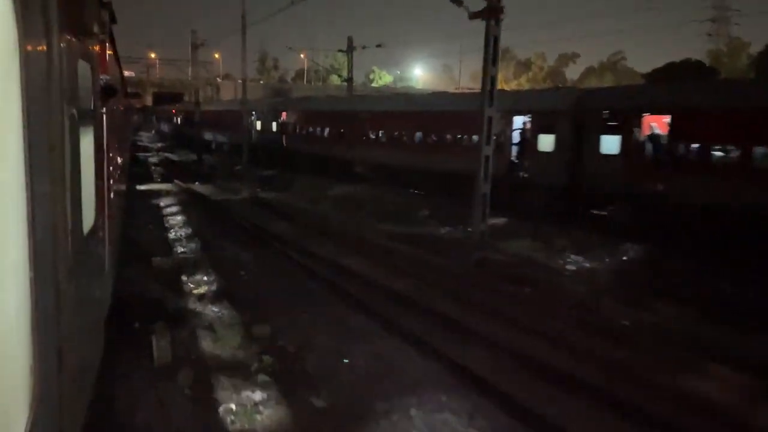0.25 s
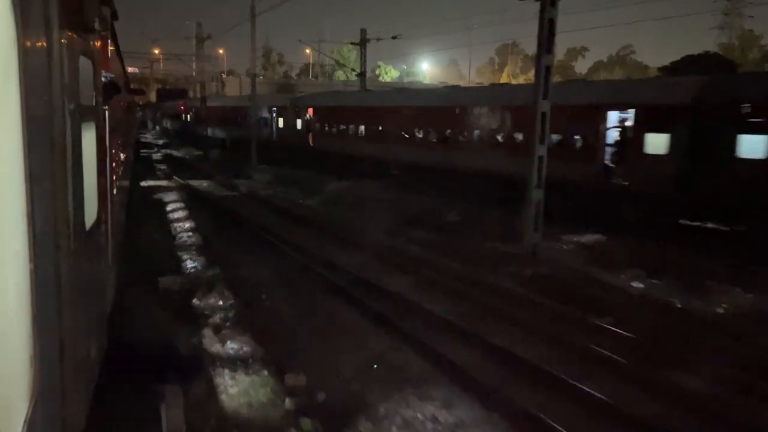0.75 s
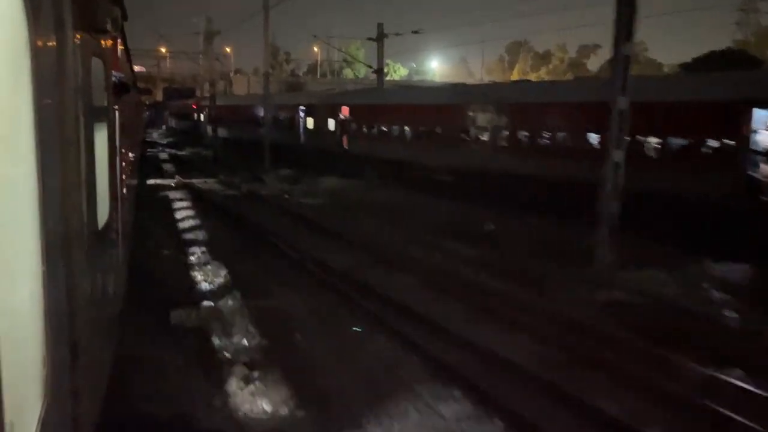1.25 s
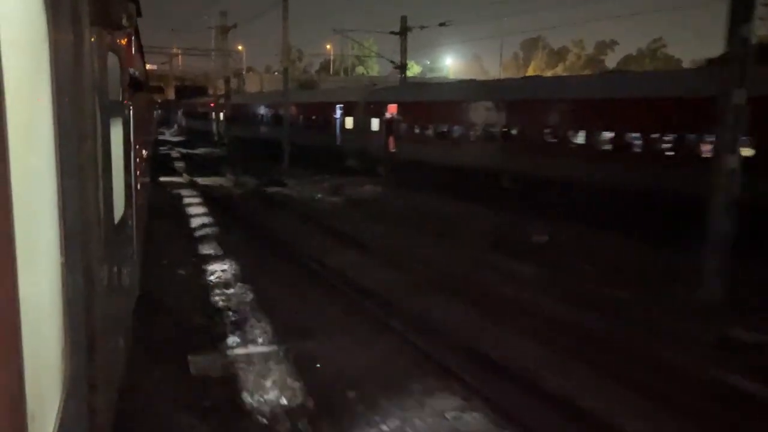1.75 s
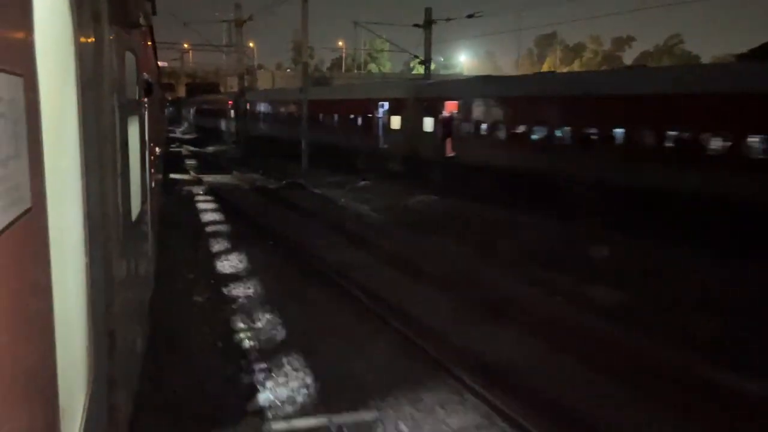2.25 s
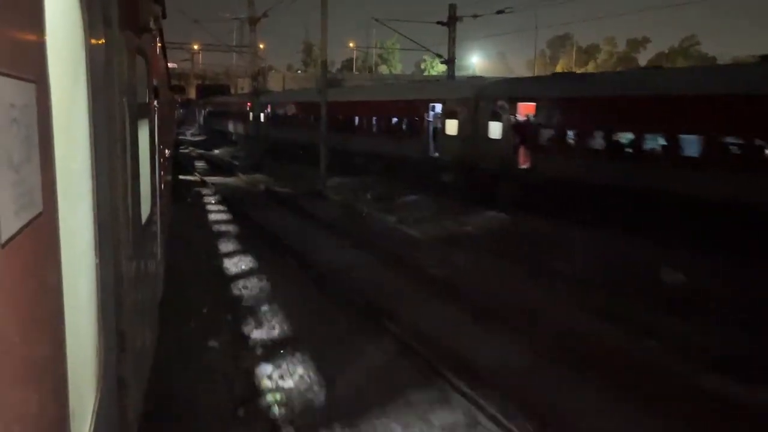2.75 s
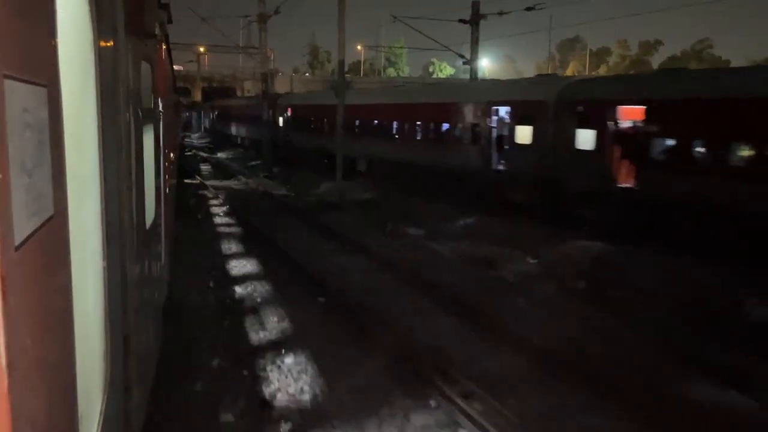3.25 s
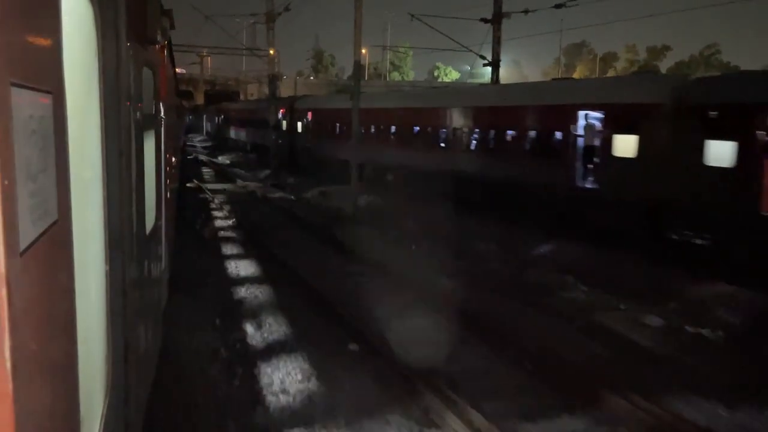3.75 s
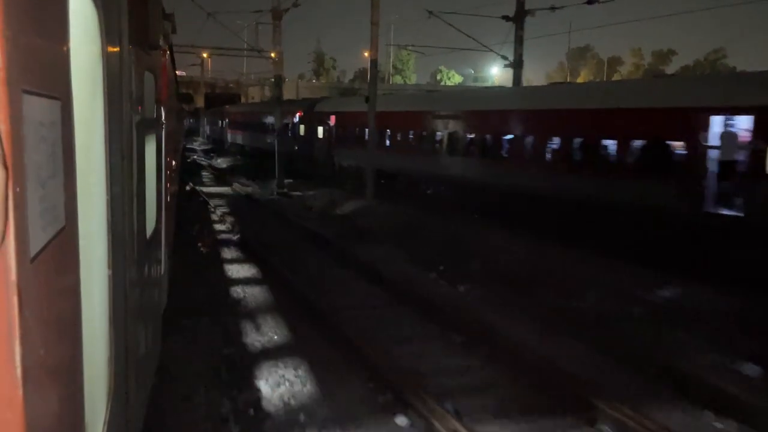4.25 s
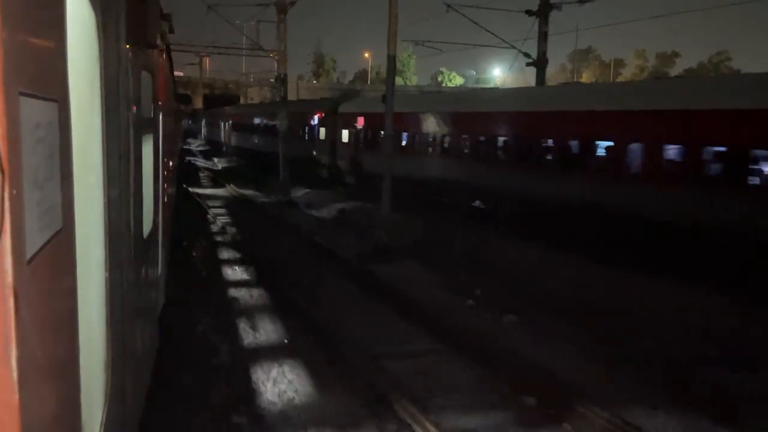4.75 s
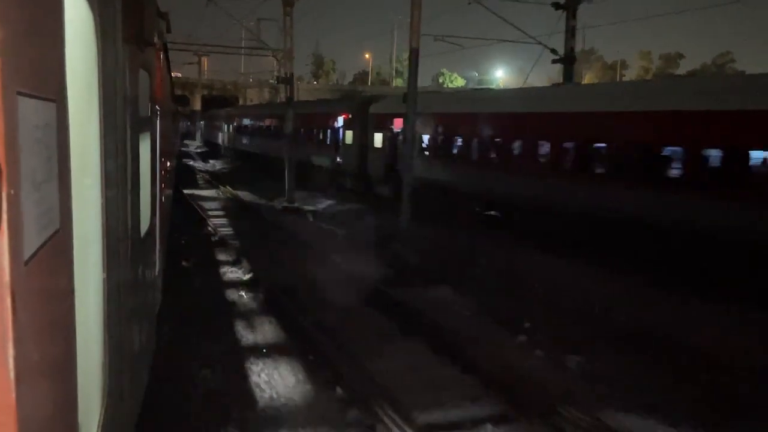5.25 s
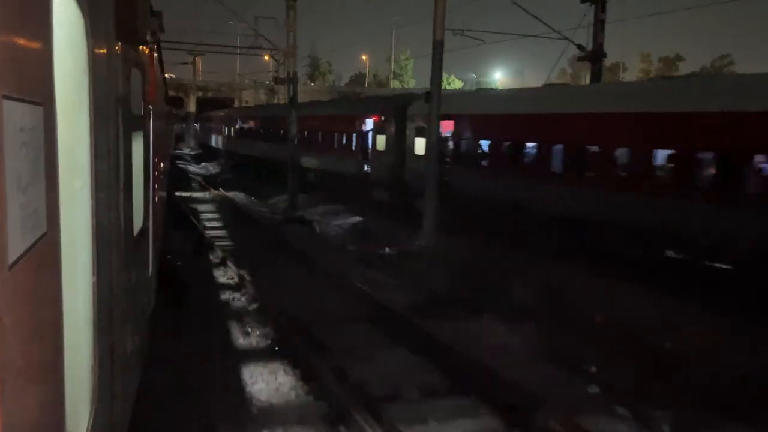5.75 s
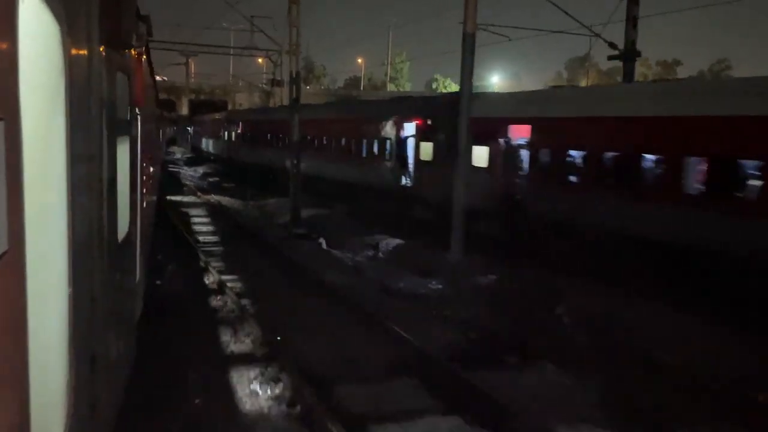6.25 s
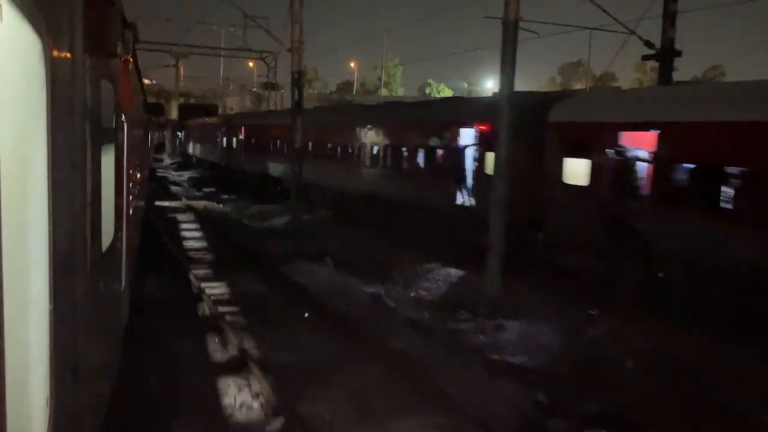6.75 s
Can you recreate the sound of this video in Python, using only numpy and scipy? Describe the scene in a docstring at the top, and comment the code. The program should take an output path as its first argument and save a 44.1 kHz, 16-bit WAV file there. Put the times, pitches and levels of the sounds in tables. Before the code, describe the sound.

Heard from an open coach door, slow train wheels shriek, scrape and thud over rail joints, with a short quiet gap before squealing again.

```python
"""Train wheels squeal and grind as a passenger train rolls slowly through a station yard,
heard from an open coach door. Wheel tones sing together with pitch-shifted reflections from the
moving coaches, and flanges pressed on the rail make noise that rings the wheels. Steel clangs,
wheels knock over joints and points as bursts in the coach body and bogie, and the rolling coach
rumbles and rattles as coloured noise."""
import sys
import numpy as np
from scipy import signal
from scipy.fft import rfft, irfft
from scipy.io import wavfile

SR = 44100
rng = np.random.default_rng(int(sys.argv[2]) if len(sys.argv) > 2 else 0)


def pcm_store(signal):
    """Save signal as 16-bit PCM."""
    levels = np.round(np.clip(np.atleast_2d(signal), -1, 1) * 32767)
    wavfile.write(sys.argv[1], SR, levels.astype(np.int16).T)


N = 308700  # 7 seconds
T = np.arange(N) / SR
FREQS = np.fft.rfftfreq(N, 1 / SR) + 1e-3
HIGH_HZ, LOW_HZ = 4490, 2297  # pitches of the two long squeals
GEAR_PAN_DB = 2  # the running gear lies to the left: left minus right


def undb(db):
    """Decibels to gain."""
    return 10 ** (np.asarray(db) / 20)


def unit(x):
    """Scale to rms 1."""
    return x / np.sqrt(np.mean(x ** 2) + 1e-18)


def pan(db):
    """Gains that make the left louder than the right by db."""
    return undb([[db / 2], [-db / 2]])


def curves(table):
    """Each column of a timed table, joined by straight lines, sample by sample."""
    seconds, *columns = np.transpose(table)
    return [np.interp(T, seconds, column) for column in columns]


def colour(points):
    """Gain at each frequency from rows of Hz and dB."""
    hz, db = np.transpose(points)
    return undb(np.interp(np.log(FREQS), np.log(hz), db))


def resonances(modes, freqs):
    """Response of a set of damped modes, each peaking at its own pitch."""
    return sum(undb(db) / (1 + 1j * (freqs / hz - hz / freqs) * hz / width) for hz, width, db in modes)


def walk(rate, size=N):
    """Random drift with spread near 1: a new target rate times a second, joined by straight lines."""
    place = np.arange(size) * rate / SR
    knots, k = rng.standard_normal(4096), place.astype(int)
    blend = place - k
    return knots[k] + (knots[k + 1] - knots[k]) * blend


def ears(mid, side, spread):
    """Left and right from a shared part and a diffuse part."""
    return np.array([mid + spread * side, mid - spread * side]) / np.sqrt(1 + spread ** 2)


def diffuseness(freqs):
    """Long waves reach both ports alike, short ones less so; the difference eases again at the top."""
    return .16 + .68 * freqs / (freqs + 330) * freqs / (freqs + 165) / (1 + (freqs / 5500) ** 2)


def noise(gain, grain_db=0):
    """Spectrum of stereo noise with the given colour; grain_db makes its level uneven in tiny bursts."""
    mid, side = rfft(rng.standard_normal((2, N)) * undb(grain_db * walk(400)))
    return ears(mid, side, diffuseness(FREQS)) * gain


def band_rms(spectrum, lo_hz, hi_hz):
    """Strength of a stereo spectrum between two frequencies, used to set levels."""
    return np.sqrt(np.sum(abs(spectrum[:, (FREQS > lo_hz) & (FREQS < hi_hz)]) ** 2)) / N


def add(out, start, sound):
    """Mix a sound in at its time."""
    i = int(np.clip(start * SR, 0, N - 1))
    out[:, i:i + sound.shape[1]] += sound[:, :N - i]


WAVER_SHARE, WAVER_PER_S = 0.09, 14  # pitch waver as a share of the spread, and its rate
SQUEAL_ROUGH_DB = 1.5  # flutter of a squeal's level as the contact chatters


def squeal(hz, spread_hz, reflected, size, second_db=-24, third_db=-32, lead=0, width=0.54, count=11):
    """One self-excited wheel mode; reflections come with their own Doppler shifts and beat against it."""
    step = 32  # the slow changes are worked out once every 32 samples
    slow = size // step + 2
    t = np.arange(size) / SR

    def drift(rate):
        return walk(rate * step, slow)

    def turn(shift_hz):
        cycles = np.cumsum(shift_hz) * step / SR
        return np.exp(2j * np.pi * (cycles + rng.random()))

    # the further a reflection is shifted, the weaker it is
    offsets = np.linspace(-2.8, 2.8, count)
    weights = unit(np.exp(-(offsets / 2) ** 2))
    paths = [weight * turn(spread_hz * (offset + .45 * drift(15.625)))
             for offset, weight in zip(offsets, weights)]
    # each reflection arrives from its own direction, so the ports hear it out of step
    angles = width * rng.permutation(np.linspace(-1.5, 1.5, count))
    echoes = np.exp(1j * np.array([angles, -angles])) @ paths / np.sqrt(count)
    share = np.clip(reflected, 0, 1)
    # the pitch wavers with the load on the wheel, and the contact chatters
    waver = turn(WAVER_SHARE * spread_hz * drift(WAVER_PER_S))
    waver = waver * undb(SQUEAL_ROUGH_DB * drift(15.625))
    # lead: how far the left port's direct sound is ahead of the right's, in radians
    direct = np.exp(.5j * np.array([[lead], [-lead]]))
    swing = (np.sqrt(1 - share) * direct + np.sqrt(share) * echoes) * waver
    slow_t = np.arange(slow) * step / SR
    tone = np.array([np.interp(t, slow_t, s) for s in swing]) * np.exp(2j * np.pi * hz * t)
    # stick and slip add overtones
    overtones = sum(undb(db) * tone ** k / (abs(tone) + 1e-9) ** (k - 1)
                    for k, db in enumerate([second_db, third_db], 2) if k * hz < SR / 2)
    return unit((tone + overtones).real)


def long_squeal(table, hz, gain_db, spread_hz, reflected, second_db, third_db, lead=0):
    """A wheel that keeps singing, its level swelling, dipping and fluttering."""
    level_db, = curves(table)
    edge_s = 0.013  # fade at each end
    held = np.clip(np.minimum(T - table[0][0], table[-1][0] - T) / edge_s, 0, 1)
    tone = squeal(hz, spread_hz, reflected, N, second_db, third_db, lead)
    return tone * undb(level_db + gain_db) * held


# How loud the high long squeal is over time.
# Each row: time in seconds, level in dB before the gain below.
HIGH_SQUEAL_LEVELS = [(0.372, -36), (0.386, -23), (.445, -18.5), (.475, -26), (.505, -16), (.575, -26),
                      (.605, -18), (.645, -22), (.68, -16), (.715, -20.5), (0.788, -14), (0.83, -20.5),
                      (0.904, -27.5), (0.948, -13.5), (.967, -27), (.987, -17), (1.085, -24), (1.13, -19),
                      (1.16, -22.5), (1.284, -25.5), (1.45, -31.5), (1.53, -35.5), (1.8, -47)]


def high_squeal():
    """A high wheel mode sings, mostly heard through its reflections."""
    return long_squeal(HIGH_SQUEAL_LEVELS, HIGH_HZ, gain_db=1.2, spread_hz=39, reflected=.72,
                       second_db=-20, third_db=-21.5)


# How loud the low long squeal is over time.
# Each row: time in seconds, level in dB before the gain and pan below.
LOW_SQUEAL_LEVELS = [(1.2, -41), (1.45, -44), (1.8, -35.5), (2.14, -27.5), (2.25, -31), (2.38, -24.5),
                     (2.52, -29), (2.66, -37), (2.93, -32.5), (3.2, -23.5), (3.58, -26.5), (3.66, -28),
                     (3.79, -25), (3.95, -26), (4.12, -17), (4.26, -20.5), (4.5, -21.5), (4.63, -32.5),
                     (4.82, -51)]


def low_squeal():
    """A lower wheel mode sings, mostly heard directly and louder on the left."""
    tone = long_squeal(LOW_SQUEAL_LEVELS, LOW_HZ, gain_db=1.5, spread_hz=30, reflected=.36,
                       second_db=-34, third_db=-44, lead=-1.15)
    return tone * pan(4.4)


# Short squeals and groans of the wheels, and the brief tones that ring after the steel strike at 0.385 s (the
# rows from 0.385 to 0.41 s at 1960, 2668 and 5507 Hz). Each row: start in seconds, end in seconds (when it
# begins to ring out), pitch in Hz, level in dB, reflected share from 0 to 1, pitch spread of the reflections in
# Hz.
SHORT_SQUEALS = [ (.225, .33, 2660, -34, .7, 35), (.19, .33, 2170, -38, .5, 20),
                 (.47, .62, 3215, -35, .9, 35), (.78, .96, 2115, -38, .6, 20), (.6, 1.0, 7500, -36, .6, 35),
                 (.235, .32, 3570, -37.5, .8, 30), (.394, .412, 2668, -15, .6, 60),
                 (.385, .412, 1960, -19, 1, 100), (.396, .41, 5507, -20, .8, 80),
                 (.385, .44, 3784, -29, .9, 70), (.42, .5, 2668, -31, .9, 50),
                 (.385, .53, 4722, -29, .7, 35), (.4, .58, 9445, -33, .5, 45),
                 (.45, .8, 5255, -36.5, 1, 55), (.6, .76, 2145, -35, .6, 18), (.88, .98, 3446, -38, .7, 25),
                 (1.5, 1.94, 2390, -39, .25, 14), (2.32, 2.41, 2385, -30, .6, 16),
                 (2.41, 2.47, 2660, -27, .7, 45), (2.6, 3.22, 2390, -33, .5, 16),
                 (3.55, 3.8, 2385, -33, .5, 16), (3.55, 3.78, 2660, -33, .8, 35),
                 (4.2, 4.52, 3190, -35, .7, 25), (4.45, 4.52, 1005, -35, .6, 18),
                 (1.8, 2.36, 4810, -44.5, .9, 30), (1.853, 2.4, 4040, -43, .9, 30),
                 (2.45, 2.9, 7830, -34, .4, 40), (2.44, 2.606, HIGH_HZ, -22, 1, 28),
                 (2.45, 2.95, 2090, -35, 1, 70), (2.5, 2.7, 3446, -29, .3, 22),
                 (2.71, 3.08, 1748, -28.5, .65, 16), (2.6, 3.2, 4052, -29.5, .6, 28),
                 (2.6, 3.16, HIGH_HZ, -28, .6, 35), (2.8, 2.85, HIGH_HZ, -25, .6, 28),
                 (3.007, 3.09, HIGH_HZ, -22.5, .94, 28), (3.18, 3.335, 734, -24.5, .1, 9),
                 (3.39, 3.51, 732, -25, .2, 10), (3.18, 3.44, 1470, -38, .2, 12),
                 (3.323, 3.434, 6280, -30, .7, 50), (3.375, 3.5, HIGH_HZ, -21, .6, 30),
                 (3.36, 4.0, 1750, -35, 1, 22), (3.62, 3.72, 1760, -29, .6, 18),
                 (3.715, 3.92, 1771, -23.2, .1, 12), (3.6, 4.0, 3560, -36, 1, 65),
                 (3.398, 4.45, 4070, -38, .9, 50), (4.06, 4.5, 855, -34, .4, 9),
                 (3.55, 3.6, 1115, -32, .7, 25), (3.88, 4.08, 1060, -33.5, 1, 60),
                 (3.997, 4.3, 10900, -38, .5, 50), (4.303, 4.55, 2385, -30, .95, 20),
                 (4.5, 4.74, 4810, -45, 1, 40), (5.03, 5.324, 3540, -47.5, 0, 20),
                 (5.795, 5.96, 3272, -22.5, .15, 20), (5.98, 6.3, 3270, -31, .9, 35),
                 (5.785, 5.86, 1000, -29, .7, 25), (5.86, 6.38, 970, -31, 1, 50),
                 (5.85, 6.35, 2295, -25, .6, 20), (5.85, 6.28, 2360, -25, .7, 22),
                 (5.77, 6.32, 4984, -30.5, .9, 35), (5.95, 6.38, 4780, -29.5, .8, 35),
                 (5.88, 6.4, 5857, -31, .9, 35), (5.9, 6.28, 856, -24.5, .4, 12),
                 (5.95, 6.16, 4065, -25.5, .85, 45), (6.23, 6.42, 4040, -29, .8, 30),
                 (5.85, 6.39, 1745, -32, 1, 22), (6.297, 7.0, 248.6, -31, .57, 9),
                 (6.4, 7.0, 4460, -39.5, 1, 40), (6.58, 6.93, 6190, -37, .9, 40),
                 (6.6, 6.95, 6450, -42, 1, 100), (6.51, 6.65, 2659, -34, .6, 22),
                 (6.66, 6.89, 2015, -34.5, 1, 36)]
SQUEAL_RISE_SHARE = 0.16  # part of its length that a squeal takes to build up
# longest time to fade 20 dB; squeals shorter than the second value fade clearly sooner
SQUEAL_FALL_S, SQUEAL_FALL_LENGTH_S = 0.43, 0.29
GROAN_BELOW_HZ, GROAN_PAN_DB = 900, 5.5  # the low groans lie to the left: left minus right


def short_squeals():
    """Modes that build up, hold briefly and ring out when the wheel lets go; a few brief ones ring after the
    steel strike at 0.385 s."""
    out = np.zeros((2, N))
    for start, end, hz, db, reflected, spread_hz in SHORT_SQUEALS:
        length = max(end - start, .01)
        rise = SQUEAL_RISE_SHARE * length
        fall = SQUEAL_FALL_S * np.tanh(length / SQUEAL_FALL_LENGTH_S)
        t = T[:int((length + 2 * fall) * SR)]
        build_up = np.sin(np.pi / 2 * np.minimum(t / rise, 1)) ** 2
        ring_out = 10 ** -(np.maximum(t - length, 0) / fall)
        tone = squeal(hz, spread_hz, reflected, len(t)) * build_up * ring_out
        add(out, start, tone * undb(db) * pan(GROAN_PAN_DB * (hz < GROAN_BELOW_HZ)))
    return out


# A flange presses on the rail, grows or weakens, then lets go.
# Each row: start in seconds, end in seconds, bite time in seconds, first level in dB, last level in dB,
# then fine hiss, growl and wheel ring, each in dB relative to the grinding (all before later trims).
FLANGE_SCRAPES = [(0.184, .38, 0.13, -30, -39, -9, 15.5, -1), (0.372, 0.4, 0.028, -24, -21.5, -19, -0.5, 3),
                  (0.41, 0.94, 0.049, -28.5, -34.5, 0, 0.5, 2.5),
                  (1.055, 1.432, 0.095, -31, -40.5, -1.5, 0.5, 0),
                  (1.473, 2.4, .11, -44, -36, -11.5, 7.5, -1.5),
                  (2.398, 3.127, 0.053, -24, -29, -6, -2.5, -2),
                  (3.317, 3.44, 0.035, -27, -27.5, -3, 1.5, 0.5),
                  (3.475, 4.555, 0.16, -26, -31.5, -7.5, 4, 0),
                  (5.355, 5.514, .04, -51, -54.5, 7.5, 0, -10), (5.757, 6.39, 0.11, -25.5, -24, -5, 7, 1),
                  (6.44, 6.989, .11, -34, -39, -9.5, 4, -8)]
RELEASE_DB_PER_S = 68  # every scrape dies away alike, on top of its last level
# the treads alone, with the flanges clear (before later trims)
IDLE_GRIND_DB, IDLE_HISS_DB = -59, -62


def flange_levels():
    """Gains of grind, hiss, growl, ring: a scrape bites, holds while drifting up or down, and lets go."""
    power = undb([[IDLE_GRIND_DB], [IDLE_HISS_DB], [IDLE_GRIND_DB], [IDLE_GRIND_DB]]) ** 2
    for start, end, bite_s, first_db, last_db, fine_db, growl_db, ring_db in FLANGE_SCRAPES:
        held_db = np.interp(T, [start, end], [first_db, last_db])
        db = held_db - RELEASE_DB_PER_S * np.maximum(T - end, 0)
        gain = np.clip((T - start) / bite_s, 0, 1) * undb(db)
        power = power + (gain * undb([[0], [fine_db], [growl_db], [ring_db]])) ** 2
    return np.sqrt(power)


# Tone colour of the grinding noise. Each row: frequency in Hz, relative strength in dB per Hz.
GRINDING_COLOUR = [(300, -60), (600, -2), (950, 6), (1300, -4.5), (1620, 6.5), (2000, -1.5), (2600, 3.5),
                   (3700, 4), (5200, 3), (6500, 7), (7800, -5.5), (9200, 3), (11000, -0.5), (13000, 0),
                   (15500, -4)]
# Wheel resonances that the grinding rings.
# Each row: pitch in Hz, width in Hz, relative level in dB before the ring trim.
WHEEL_MODES = [(1752, 60, 2), (2142, 50, -1), (2300, 50, 4), (2385, 50, 5), (2668, 70, 6), (3200, 70, 7),
               (3446, 60, 2), (3780, 70, 0), (4052, 90, 6), (4482, 120, 5), (4740, 100, 1), (5240, 90, 2),
               (5500, 90, 2), (5857, 70, -1), (6080, 90, 2), (6500, 100, 2), (6950, 90, 1), (7500, 100, 7),
               (7900, 110, 8), (8150, 90, 3), (8520, 120, 2), (8970, 110, 1), (9445, 110, -1),
               (9850, 130, 0), (10420, 130, -1), (10950, 130, 1), (11430, 130, -1), (11960, 140, 0)]


def grinding(grind_db=-2, judder_db=1.0, ring_db=1, flare_db=5.5, drift_hz=22):
    """Dense slips of the flange growl, hiss and ring the wheel; each mode flares and drifts on its own."""
    grind, hiss, growl, ring = flange_levels()
    sound, slips = noise(colour(GRINDING_COLOUR), grain_db=1.0), noise(colour(GRINDING_COLOUR))
    low = 1 / (1 + (FREQS / 7500) ** 6)
    deep = 1 / (1 + (FREQS / 1400) ** 6)
    ringing = 0
    for hz, width, db in WHEEL_MODES:
        # only positive frequencies are filled in, so turning the mode shifts its pitch
        mode = np.fft.ifft(slips / (1 + ((FREQS / hz - hz / FREQS) * hz / width) ** 2), N)
        drift = np.exp(2j * np.pi * np.cumsum(drift_hz * walk(16)) / SR)
        ringing = ringing + 2 * (mode * drift).real * undb(db + ring_db + flare_db * walk(12))
    middle_part = irfft(sound * low * (1 - deep), N) * grind
    growl_part = irfft(sound * deep, N) * growl
    coarse = (middle_part + growl_part + ringing * ring) / band_rms(sound, 5000, 6800)
    fine = irfft(sound * (1 - low), N) / band_rms(sound, 8500, 13000)
    return (coarse * undb(grind_db) + fine * hiss) * undb(judder_db * walk(45))


def chirps(chirp_db=-6, scatter_db=3, length_s=0.098, glide=0.0056, count=300):
    """Other wheel modes catch for a moment and slip away again, as loud as the grinding drives them."""
    out, grind = np.zeros((2, N)), flange_levels()[0]
    for when, pitch, span, side in rng.random((count, 4)):
        t = T[:int(length_s * (.5 + span) * SR)]
        hz = 1900 * (7000 / 1900) ** pitch  # anywhere from 1900 to 7000 Hz
        bend = glide * (rng.standard_normal() * t / t[-1] + walk(71.4, len(t)))
        phase = 2 * np.pi * np.cumsum(hz * (1 + bend)) / SR
        db = chirp_db + scatter_db * np.clip(rng.standard_normal(), -2, 1)
        port_phase = np.array([[side - .5], [.5 - side]]) * 2
        swell = np.sin(np.pi * t / t[-1])
        add(out, when * N / SR, np.sin(phase + port_phase) * swell * undb(db))
    return out * grind


def blow(modes, t60, rise, bright_hz=8000, impact=0, hold=0, size=22050):
    """One impact and the rattle after it die away in a set of modes; scaled by its first 40 ms."""
    t, freqs = T[:size], np.fft.rfftfreq(size, 1 / SR) + 1e-3
    # t60: seconds for the rattle to fade 60 dB after the hold
    fade = np.exp(-np.log(1000) * np.maximum(t - hold, 0) / t60)
    push = rng.standard_normal((2, size)) * (1 - np.exp(-t / rise)) * fade
    push[0, int(2 * rise * SR)] += impact * np.linalg.norm(push[0])
    dulling = 1 + np.sqrt(2) * 1j * freqs / bright_hz - (freqs / bright_hz) ** 2
    gain = resonances(modes, freqs) / dulling
    sound = irfft(ears(*rfft(push), diffuseness(freqs)) * gain, size)
    return sound / np.std(sound[:, :SR // 25])


# Steel striking steel.
# Each row: start in seconds, level in dB, rattle fade time in seconds, brightness limit in Hz.
STEEL_STRIKES = [(0.385, -24, 0.11, 6000), (2.289, -29, .12, 1000), (2.998, -22.5, 0.3, 900),
                 (3.652, -21.5, 0.24, 850), (4.779, -31.5, 0.22, 1100), (5.332, -23, 0.31, 1800),
                 (5.465, -35, 0.12, 850), (5.611, -31, 0.33, 800), (5.742, -31.5, 0.067, 1200),
                 (6.115, -25, 0.13, 1400), (6.125, -23, 0.033, 7000), (3.004, -27, 0.017, 6000)]
# Modes that the strikes ring. Each row: pitch in Hz, width in Hz, relative level in dB.
STEEL_MODES = [(550, 140, 1.5), (856, 67, 8.5), (1014, 140, 5), (1480, 82, 5), (1640, 59, 14),
               (2220, 150, 3), (2670, 55, 10), (3040, 150, -1), (3531, 220, 0), (4650, 190, 7.5),
               (5650, 200, -11)]


def clangs():
    """A flange or coupling strikes hard and rings."""
    out = np.zeros((2, N))
    for start, db, t60, bright_hz in STEEL_STRIKES:
        add(out, start, blow(STEEL_MODES, t60, rise=0.00068, bright_hz=bright_hz, impact=0.3) * undb(db))
    return out


# The hardest knocks over joints and points.
# Each row: start in seconds, thud level in dB, thud pitch in Hz, clank level in dB, clank pitch in Hz
# (levels before the trims below).
JOINT_KNOCKS = [(.004, -11.5, 128, -21, 268), (0.156, -12.5, 130, -31, 269), (.208, -17, 65, -25, 480),
                (0.268, -9, 65, -33, 300), (0.344, -14.5, 151, -25.5, 248), (0.391, -16.5, 80, -41, 270),
                (0.443, -30, 90.5, -35, 405), (0.787, -13, 172, -31, 415), (0.971, -27, 200, -34, 292),
                (1.106, -37, 100, -35, 470), (1.595, -15.5, 136, -26.5, 283), (1.961, -20, 130, -30.5, 477),
                (2.229, -16.5, 141, -39, 272), (2.288, -37, 90, -26.5, 450),
                (2.377, -10.5, 136, -19.5, 350), (2.492, -30, 90, -20, 327), (2.554, -21, 110, -29, 340),
                (2.635, -26, 100, -19.5, 330), (2.834, -14, 110, -23.5, 345), (2.998, -14.5, 150, -23, 324),
                (3.03, -11.5, 109, -38, 372), (3.207, -16.5, 169, -32, 340), (3.335, -20, 130, -25, 510),
                (3.416, -12.5, 159, -48, 340), (3.511, -16, 133, -32, 392), (3.628, -22, 100, -22, 387),
                (4.081, -12.5, 170, -26, 453), (4.168, -15.5, 159, -35, 298), (4.779, -20.5, 130, -31, 270),
                (5.128, -13.5, 109, -34, 396), (5.23, -14.5, 110, -28.5, 430),
                (5.328, -24, 109, -22.5, 530), (5.462, -19, 120, -24, 460), (5.567, -10.5, 130, -33, 330),
                (5.608, -19, 109, -23, 530), (5.62, -17, 120, -24.5, 410), (5.744, -10, 120, -24, 464),
                (5.995, -11.5, 131, -27, 420), (6.115, -20, 110, -20.5, 490), (6.283, -15, 139, -44, 280),
                (6.411, -13, 85, -26, 265), (6.505, -15.5, 65.4, -35, 270), (6.629, -21, 70, -48, 274),
                (6.752, -19, 100, -25, 542)]
# Modes of the coach body. Each row: pitch in Hz, width in Hz, relative level in dB.
BODY_MODES = [(81.6, 10.6, 12.5), (119, 41, 8), (162, 43, -1), (221, 16, 2)]
# Modes of the bogie, the wheel frame under the coach.
# Each row: multiple of the clank pitch, width in Hz, relative level in dB.
BOGIE_MODES = [(.8, 60, -11), (1, 60.3, 8.5), (1.3, 60, -2), (2.2, 200, -4)]
PANEL_WIDTH_HZ, PANEL_DB = 27, 8  # the floor panel that a thud sets ringing


def bogie_at(hz, gain_db=0):
    """The bogie's modes follow the pitch of the clank."""
    return [(multiple * hz, width, db + gain_db) for multiple, width, db in BOGIE_MODES]


def knocks(thud_db=-6.5, clank_db=-1):
    """Each joint clanks the bogie and thuds through the coach body and one of its floor panels."""
    out = np.zeros((2, N))
    for start, thud, panel_hz, clank, clank_hz in JOINT_KNOCKS:
        body = BODY_MODES + [(panel_hz, PANEL_WIDTH_HZ, PANEL_DB)]
        low_thud = blow(body, t60=0.24, rise=0.003716, bright_hz=267, impact=0.72, hold=0.017)
        add(out, start, low_thud * undb(thud + thud_db) * pan(GEAR_PAN_DB / 2))
        metal = blow(bogie_at(clank_hz), t60=0.12, rise=0.00208, bright_hz=610, impact=0.48, hold=0.026)
        add(out, start, metal * undb(clank + clank_db) * pan(GEAR_PAN_DB))
    return out


# How rough the track is under the coach.
# Each row: time in seconds, rumble in dB, rattle in dB (before later trims).
TRACK_ROUGHNESS = [(0.0, -26, -25), (0.25, -17, -25.5), (0.54, -29.5, -38), (1.05, -30.5, -35.5),
                   (1.21, -31, -38), (1.89, -31.5, -38.5), (2.48, -21, -25.5), (2.73, -26.5, -27.5),
                   (3.29, -24.5, -28), (3.53, -22.5, -26), (3.84, -25, -31), (4.13, -17, -29.5),
                   (4.46, -27, -30.5), (4.8, -22.5, -34.5), (5.79, -20, -26.5), (6.16, -23.5, -27.5),
                   (7.0, -23, -31)]


def jolts(jolt_db=-3, scatter_db=2, count=36):
    """Small bumps at random moments all along shake body and bogie, harder where the track is rough."""
    out, (rumble, _) = np.zeros((2, N)), curves(TRACK_ROUGHNESS)
    modes = BODY_MODES + bogie_at(340, gain_db=-26)  # the bogie's usual pitch in Hz
    for k, (late, weakness) in enumerate(rng.random((count, 2))):
        bump = blow(modes, t60=0.078, rise=0.00312, bright_hz=500, impact=0.36)
        add(out, (k + late) / count * N / SR, bump * undb(jolt_db - 2 * scatter_db * weakness))
    return out * undb(rumble)


# Tone colour of the rolling noise. Each row: frequency in Hz, relative strength in dB per Hz.
ROLLING_COLOUR = [(20, -34), (35, -11.5), (58, 6.5), (85, 1.5), (130, -2), (230, -7.5), (450, -11),
                  (650, -20.5), (980, -19), (1300, -27.5), (1700, -25.5), (3000, -30), (6000, -39.5),
                  (15000, -77)]


def rolling(rumble_db=-1, rattle_db=-3, throb_db=2, shake_db=2):
    """Rough wheels drum the coach body; loose running gear rattles above the rumble."""
    rumble, rattle = curves(TRACK_ROUGHNESS)
    sound = noise(colour(ROLLING_COLOUR), grain_db=-1.0)
    low = 1 / (1 + (FREQS / 250) ** 4)
    body = irfft(sound * low, N) / band_rms(sound, 40, 250)
    gear = irfft(sound * (1 - low), N) / band_rms(sound, 280, 680) * pan(GEAR_PAN_DB)
    body = body * undb(rumble + rumble_db + throb_db * walk(13))
    return body + gear * undb(rattle + rattle_db + shake_db * walk(28))


def scene():
    """Wheel squeals and grinding over the knocks and rumble of the coach."""
    squeals = high_squeal() + low_squeal() + short_squeals()
    wheels = squeals + grinding() + chirps()
    coach = clangs() + knocks() + jolts() + rolling()
    return wheels + coach


# Phase between the two microphone ports. Each row: frequency in Hz, left minus right in radians.
PORT_PHASE = [(0, 0), (500, 0), (1200, 1.1), (2300, -.3), (3200, .9), (4400, .1), (5400, .8), (5750, -1.7),
              (7300, -3.1), (10400, -6.3), (11600, -6.3), (14000, -9.4)]


def record(dry):
    """Two microphone ports hear the sound out of step; peaks clip and the top is cut."""
    phase = np.interp(FREQS, *np.transpose(PORT_PHASE))
    ported = irfft(rfft(dry) * np.exp(.5j * np.array([phase, -phase])), N)
    top_cut = signal.ellip(10, .2, 80, 15700, fs=SR, output="sos")  # cut above 15700 Hz
    return signal.sosfilt(top_cut, np.clip(ported, -1, 1))


dry = scene()
out = record(dry)
pcm_store(out)
```